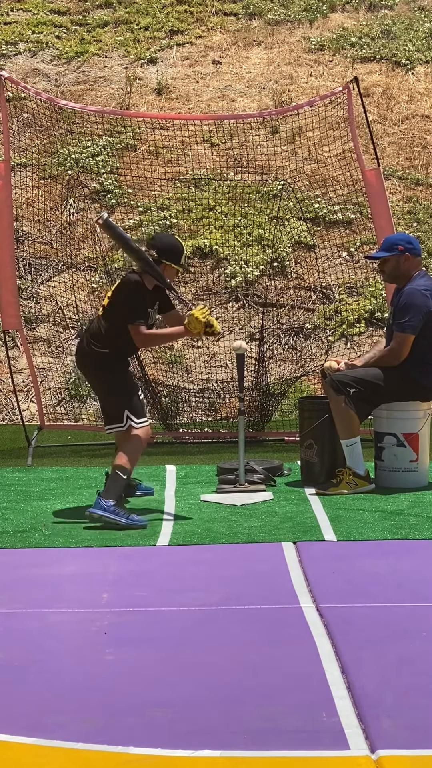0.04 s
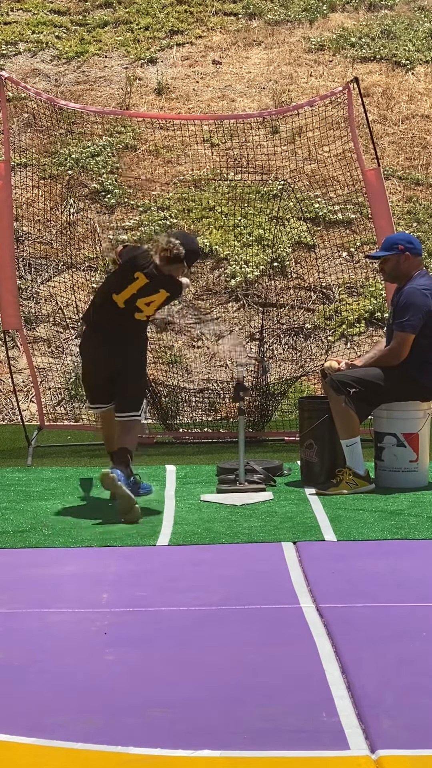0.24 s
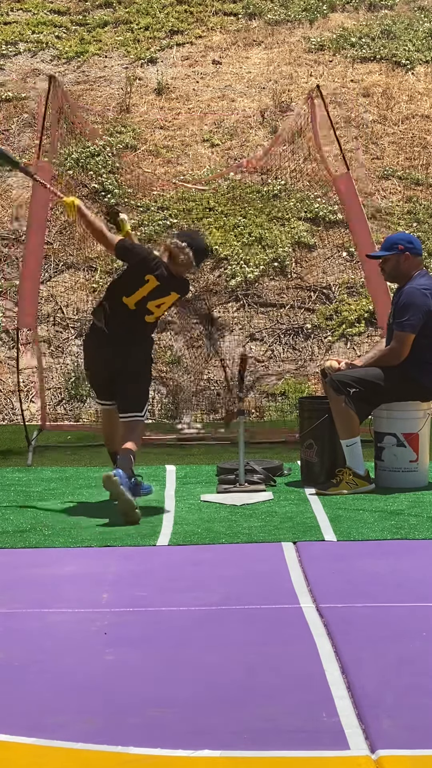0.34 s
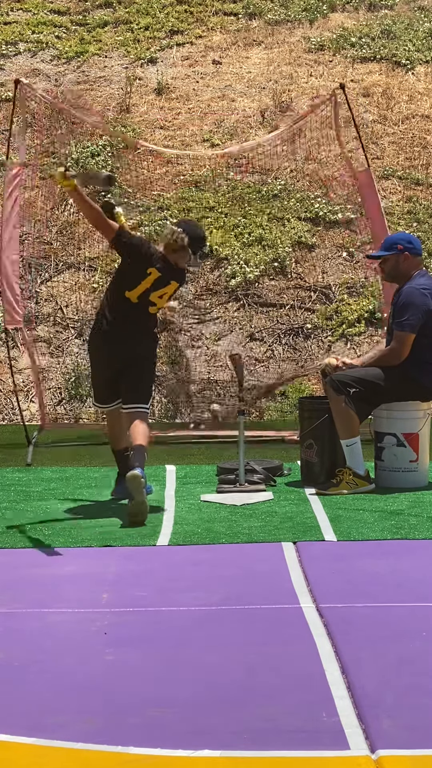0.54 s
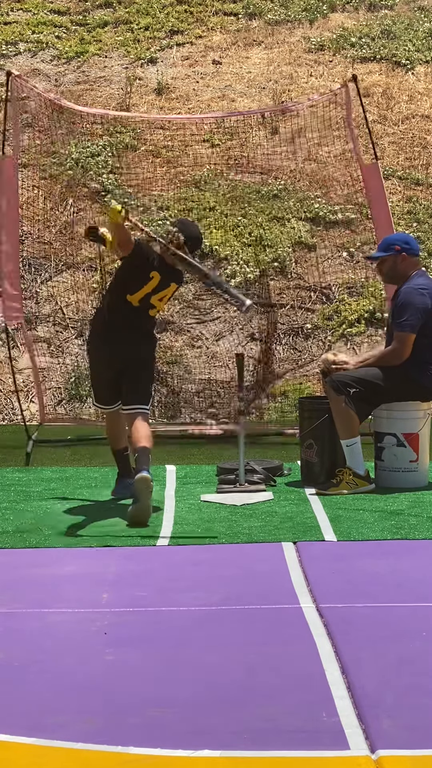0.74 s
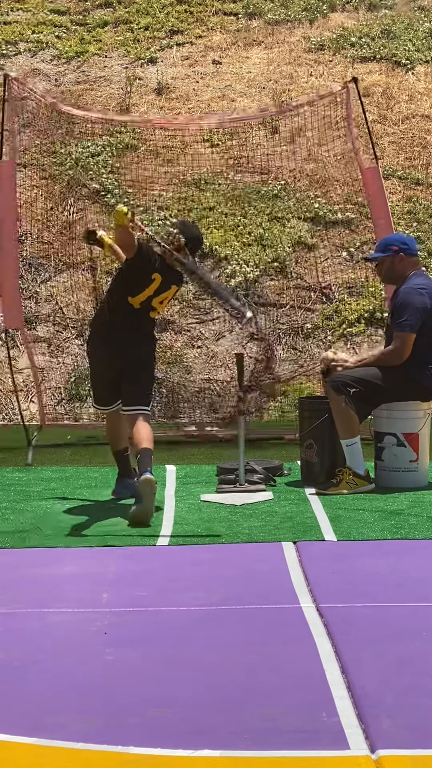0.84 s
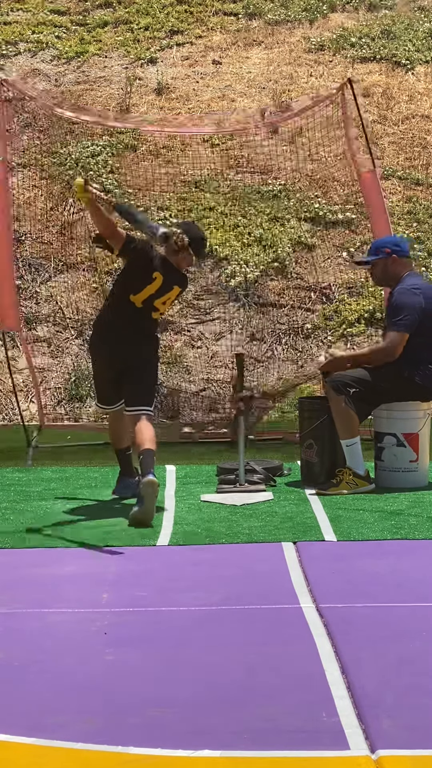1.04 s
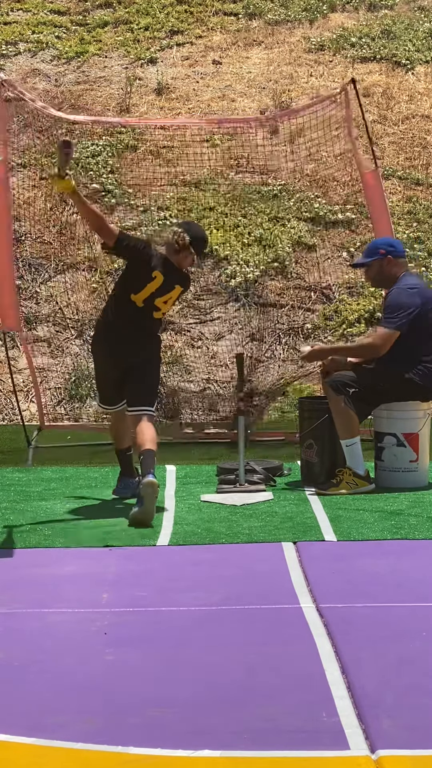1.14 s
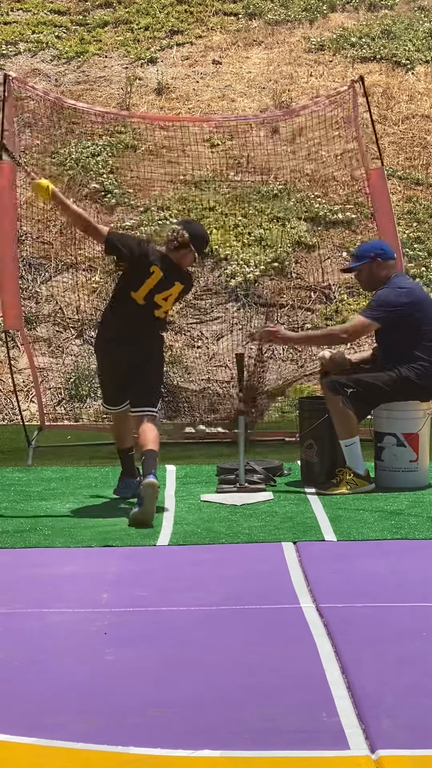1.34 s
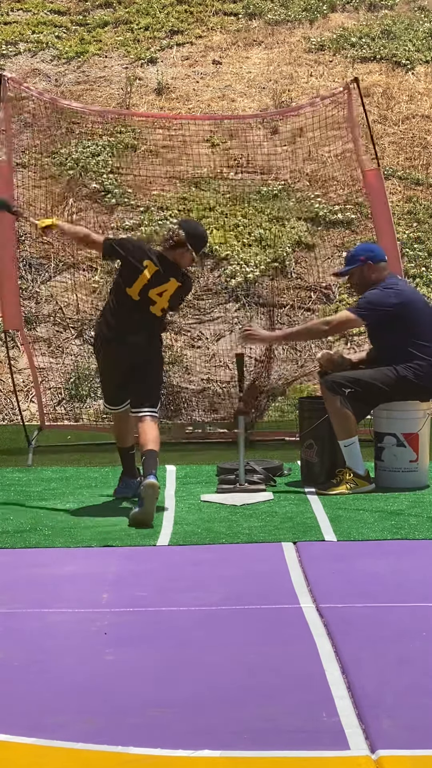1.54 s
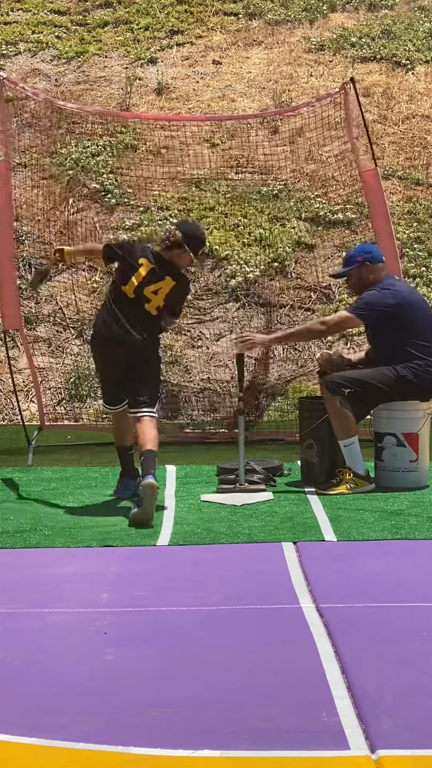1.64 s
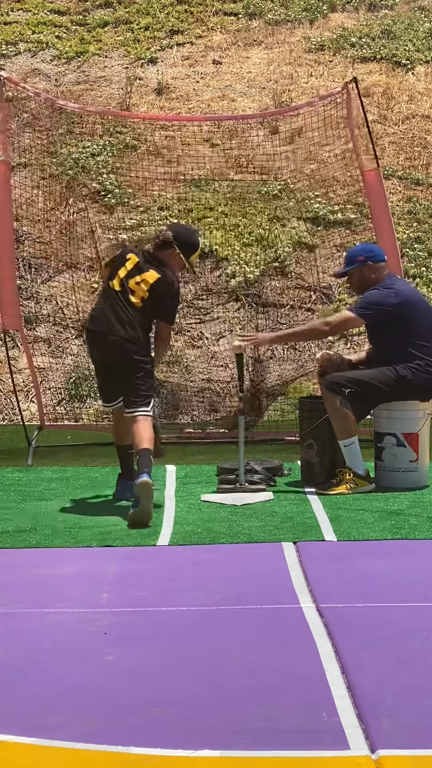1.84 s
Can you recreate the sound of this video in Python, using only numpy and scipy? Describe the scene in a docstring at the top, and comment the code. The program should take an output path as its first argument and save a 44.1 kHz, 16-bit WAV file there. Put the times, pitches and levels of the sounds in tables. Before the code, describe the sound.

A metal bat strikes a ball with one loud, sharp, pinging crack, a few metres from a stereo microphone outdoors; short echoes scatter off ground and hillside, then faint thuds, net rustle and a distant engine hum.

```python
"""A bat cracks a ball off a tee a few metres away: damped modes and contact noise, then a pinging barrel. The
ground, court and a hillside of the practice field return it as delayed copies and decaying noise. Tone bursts
and bands carry the ping's echoes, Doppler-shifted because the bat is moving. Shaped noise makes the rustling
net and scuffing shoes; damped tones with noise make the dropping ball's thuds. Beneath lie coloured noise for
open air and a wavering tone for a faint far engine."""
import sys
import numpy as np
from scipy import signal
from scipy.fft import rfft, irfft
from scipy.io import wavfile

SR = 44100
rng = np.random.default_rng(int(sys.argv[2]) if len(sys.argv) > 2 else 0)


def wrap_up_sound(samples):
    """Save the sound to the file named by the first command line argument, as 16-bit audio."""
    columns = np.atleast_2d(samples).T
    # keep every value between -1 and 1, then stretch to whole-number steps
    tamed = np.clip(columns, -1, 1)
    steps = np.round(tamed * 32767).astype(np.int16)
    wavfile.write(sys.argv[1], SR, steps)


N = 83790
T = np.arange(N) / SR   # s
HZ = np.maximum(np.fft.rfftfreq(N, 1 / SR), 1)   # kept above zero for the log axis
HIT_S = .2244


def from_db(db):
    """Logarithmic level: decibels to amplitude gain."""
    return 10 ** (np.asarray(db) / 20)


def over_hz(points):
    """Spectral envelope: a table interpolated over log frequency at every bin."""
    hz, value = np.transpose(points)
    return np.interp(np.log(HZ), np.log(hz), value)


# Unrelated (side) share of diffuse sound: f/Hz, level/dB relative to the common (mid) part
SIDE_SHARE = [(50, -36), (120, -28), (250, -17), (600, -7), (1100, -6), (1700, -20), (2500, -16),
              (3700, -24), (8000, -20), (12000, -30)]


def noise(gain, shape=1):
    """Diffuse field: stereo noise under an envelope, then coloured; the mid has rms 1 if the envelope does."""
    mid, side = rfft(rng.standard_normal((2, N)) * shape)
    colour = gain / np.sqrt(np.mean(np.square(gain)))
    side = side * from_db(over_hz(SIDE_SHARE))
    left_right_sign = np.array([[1], [-1]])
    return irfft(colour * (mid + side * left_right_sign), N)


def band(hz, width_hz):
    """Band-pass response: steep skirts, with half gain at the two edges of the width."""
    return 1 / (1 + np.square(np.square(2 * (HZ - hz) / width_hz)))


def dying(start, t60):
    """Exponential damping: silence until the start, then a fall of 60 dB in t60 seconds."""
    return (T >= start) * np.exp(-np.log(1000) * np.maximum(T - start, 0) / t60)


def ring(start, hz, db, t60):
    """Free vibration: one struck mode as a damped sine."""
    return from_db(db) * dying(start, t60) * np.sin(2 * np.pi * hz * (T - start))


def modes(start, table):
    """Modal superposition: struck modes summed with alternating sign."""
    return sum((-1) ** k * ring(start, hz, db, t60) for k, (hz, db, t60) in enumerate(table))


def swell(centre, length):
    """Raised-cosine window: a smooth rise and fall over the length in seconds."""
    return np.cos(np.pi * np.clip((T - centre) / length, -.5, .5)) ** 2


# Open air spectrum: f/Hz, relative level per Hz/dB
AIR_SPECTRUM = [(20, -21.5), (40, -4.5), (60, -2), (115, -1), (145, -10.5), (182, -10), (212, -11.5),
                (274, -18), (372, -17), (480, -21), (1030, -24.5), (1500, -32.5), (2450, -37),
                (4500, -38.5), (6400, -39.5), (10000, -45.5), (13000, -54), (15500, -66)]
# Engine hum, rms: t/s, level/dB
HUM_LEVELS = [(0, -56.5), (.7, -57), (1.0, -61), (1.35, -57.5), (1.48, -52), (1.6, -49), (1.75, -51.5),
              (1.9, -53.5)]
AIR_DB = -53
HUM_HZ, HUM_WAVER = 102.7, 0.0056   # the waver is an rms fraction of the frequency
DRONE_HZ, DRONE_WIDTH_HZ, DRONE_DB = 241.4, 10, -67


def background():
    """Frequency modulation wavers a far engine's hum, over a narrow noise drone and broadband open air."""
    waver = noise(band(0, 30))[0]   # half gain at 15 Hz
    phase = 2 * np.pi * np.cumsum(HUM_HZ * (1 + HUM_WAVER * waver)) / SR
    hum_level = from_db(np.interp(T, *np.transpose(HUM_LEVELS)))
    hum = hum_level * np.sqrt(2) * np.sin(phase)   # root 2 turns rms into peak
    drone = from_db(DRONE_DB) * noise(band(DRONE_HZ, DRONE_WIDTH_HZ))
    air = from_db(AIR_DB) * noise(from_db(over_hz(AIR_SPECTRUM)))
    return hum + drone + air


# Scuffs of shoes and net: centre t/s, length t/s, level/dB
SCUFFS = [(0.037, 0.094, -66), (0.164, 0.14, -65), (.165, .007, -56), (0.484, 0.0089, -62.5),
          (0.648, 0.091, -68.5), (0.671, .015, -69), (0.727, 0.0077, -64.5), (0.801, 0.023, -70.5)]
# Scuff spectrum: f/Hz, relative level per Hz/dB
SCUFF_SPECTRUM = [(500, -25.5), (2000, -2.5), (3800, -2.5), (4600, -2.5), (5500, 1.5), (7000, -7.5),
                  (11000, -7), (15000, -19)]
# Shaken net spectrum: f/Hz, relative level per Hz/dB
NET_SPECTRUM = [(300, -4.5), (900, -0.5), (2000, 0), (4000, -3), (6000, -10), (10000, -17.5), (15000, -29)]
NET_S, NET_DB, NET_T60_S = 0.3, -61.5, 2.7   # the net takes the ball and goes on shaking


def rustles():
    """Friction noise: brief dry scuffs, and the slowly damped hiss of the shaken net."""
    envelope = sum(from_db(db) * swell(centre, length) for centre, length, db in SCUFFS)
    scuffs = envelope * noise(from_db(over_hz(SCUFF_SPECTRUM)))
    net = from_db(NET_DB) * dying(NET_S, NET_T60_S) * noise(from_db(over_hz(NET_SPECTRUM)))
    return scuffs + net


# Brief crack of bat and ball: f/Hz, level/dB, t60/s
CRACK = [(935, -28.5, .008), (1306, -6.5, .016), (2475, -20.5, 0.025), (2967, -16.5, 0.024),
         (3700, -18, 0.024), (5120, -24.5, 0.036), (5490, -24, .03), (6060, -22, .02), (6575, -33.5, 0.029),
         (7213, -15, .011), (9460, -32.5, 0.0073)]
# Contact noise spectrum: f/Hz, relative level per Hz/dB
SNAP_SPECTRUM = [(100, -14.5), (500, -6), (780, -16.5), (1100, -3), (1600, -7.5), (2600, -3), (4400, -13.5),
                 (7000, -6), (10000, -14.5), (16000, -24)]
# Thump of the squashed ball: f/Hz, level/dB, t60/s
THUMP = [(129.45, -18.5, .04), (250, -10, 0.01622), (577, -14, .013)]
RELEASE_S = .0012   # after the hit: the ball leaves the barrel, which then pings freely
PING_HZ, PING_DB, PING_T60_S = 1908, -4.5, 0.064
SNAP_DB, SNAP_T60_S = -18.5, .015
LOW_CUT_HZ = 85


def bat():
    """Impact excitation: snap and crack, then thump and ping; small bodies radiate little bass."""
    crack = modes(HIT_S, CRACK)
    snap = from_db(SNAP_DB) * dying(HIT_S, SNAP_T60_S) * noise(from_db(over_hz(SNAP_SPECTRUM)))[0]
    free = HIT_S + RELEASE_S
    thump = modes(free, THUMP)
    ping = ring(free, PING_HZ, PING_DB, PING_T60_S)
    low_cut = signal.butter(2, LOW_CUT_HZ, "high", fs=SR, output="sos")
    return signal.sosfilt(low_cut, crack + snap + thump + ping)


# Ground and near objects: delay t/s, level/dB, dulling corner f/Hz
REFLECTION_PATHS = [(.00339, -15.5, 6000), (.01149, -19, 2500), (.01488, -19, 2000), (.0182, -23, 7840),
                    (0.0198, -18.5, 2500), (.047, -29, 4000), (.0615, -32, 4930), (.073, -25, 1500)]


def reflections(x):
    """Specular reflection: each path delays the sound and dulls it with a first-order low-pass."""
    paths = 0
    for delay, db, corner_hz in REFLECTION_PATHS:
        delayed = np.exp(-2j * np.pi * HZ * delay)
        paths = paths + from_db(db) * delayed / (1 + 1j * HZ / corner_hz)
    return irfft(rfft(x) * paths, N)


# Diffuse return from court and hillside: f/Hz, relative level per Hz/dB
SCATTER_SPECTRUM = [(60, -8.5), (130, -1.5), (300, -7), (430, -4), (600, 1), (760, -2.5), (900, -1),
                    (1100, -4), (1320, -0.5), (1650, -9), (2000, -2.5), (2400, -7.5), (3700, -13.5),
                    (4600, -18.5), (5500, -15), (7500, -22.5), (9700, -22), (12000, -29), (15000, -30)]
# Ping returned spread in pitch: centre f/Hz, width f/Hz, level/dB, t60/s
PING_BANDS = [(1970, 220, -35.5, 0.65), (1340, 140, -46, 0.79)]
# Distinct returns of the ping: centre t/s, length t/s, f/Hz, level/dB
PING_RETURNS = [(0.255, .03, 1948, -34), (0.279, 0.023, 1935, -30.5), (0.307, 0.024, 1956, -35),
                (0.376, 0.044, 1965, -47), (0.417, 0.086, 2077, -43), (0.469, 0.036, 1972, -49)]
NEAR_DB, NEAR_T60_S, FAR_DB, FAR_T60_S = -27, .1, -37, 0.66
SCATTER_GRAIN_DB, GRAIN_RATE_HZ = 3, 400   # rms level flutter, and where its spectrum is at half gain


def field():
    """Scattering and Doppler shift: grainy noise decays at two rates; the ping returns at shifted pitches."""
    start = HIT_S + REFLECTION_PATHS[0][0]   # with the first reflection
    near = from_db(NEAR_DB) * dying(start, NEAR_T60_S)
    far = from_db(FAR_DB) * dying(start, FAR_T60_S)
    grain = from_db(SCATTER_GRAIN_DB * noise(band(0, 2 * GRAIN_RATE_HZ))[0])
    grain = grain / np.sqrt(np.mean(grain ** 2))
    out = (near + far) * noise(from_db(over_hz(SCATTER_SPECTRUM)), grain)
    for hz, width_hz, db, t60 in PING_BANDS:
        out += from_db(db) * dying(start, t60) * noise(band(hz, width_hz))
    for centre, length, hz, db in PING_RETURNS:
        tone = np.sin(2 * np.pi * (hz * T + rng.random()))
        out += from_db(db) * swell(centre, length) * tone
    return out


# Ball meets the net and drops, feet settle: t/s, level/dB, f/Hz, t60/s (the mode takes half this t60)
THUD_EVENTS = [(.27, -34, 619, 0.058), (.295, -33, 904.3, 0.071), (.375, -39, 69, 0.2),
               (.8035, -39, 708, 0.0251), (.816, -45, 495, .035), (.844, -50, 480, 0.038),
               (.914, -42, 250, 0.078), (1.195, -51.5, 427, 0.093)]


def thuds():
    """Heavily damped impact: a soft knock's mode and a puff of noise around it."""
    out = 0
    for start, db, hz, t60 in THUD_EVENTS:
        puff = from_db(db - 5.5) * noise(band(hz, 1.1 * hz), dying(start, t60))
        out = out + ring(start, hz, db, t60 / 2) + puff
    return out


def scene():
    """Linear superposition: the quiet field, the hit and its echoes."""
    hit = bat()
    return background() + rustles() + hit + reflections(hit) + field() + thuds()


# Phase between left and right: f/Hz, lead of left over right/rad; the top is nearly opposed
PHASE_LEAD = [(30, 0), (100, -.04), (200, -.17), (400, -.6), (750, -.85), (1050, -.7), (1300, -.2),
              (1700, .03), (1950, .22), (2500, 1.1), (3100, .7), (3700, .15), (4400, .8), (4800, 2.4),
              (4950, 3.6), (5250, 6.1), (5550, 6.3), (7000, 7.4), (10000, 8.6), (11500, 9.35),
              (15500, 9.42)]
# Level between left and right: f/Hz, left minus right level/dB
LEVEL_BALANCE = [(60, 0), (120, .4), (330, 3), (700, 1.5), (1290, 0), (2400, -.3), (15000, 0)]
CUTOFF_HZ = 15900


def record(dry):
    """Interchannel difference and saturation: left and right part in phase and level, peaks round, the top is cut."""
    half = np.array([[.5], [-.5]])   # each channel takes half of every difference
    balance = from_db(half * over_hz(LEVEL_BALANCE))
    phase = np.exp(1j * half * over_hz(PHASE_LEAD))
    pair = irfft(rfft(dry) * balance * phase, N)
    rounded = pair / (1 + (pair / .95) ** 8) ** (1 / 8)   # approaches a ceiling of .95
    top_cut = signal.ellip(10, .2, 80, CUTOFF_HZ, fs=SR, output="sos")
    return signal.sosfilt(top_cut, rounded)


dry = scene()
out = record(dry)
wrap_up_sound(out)
```